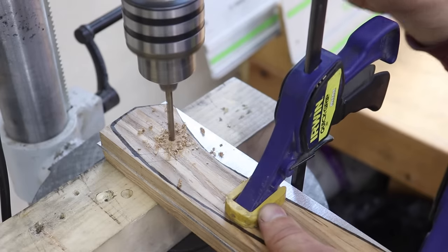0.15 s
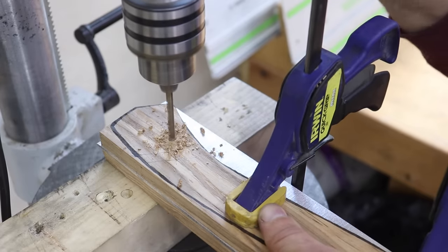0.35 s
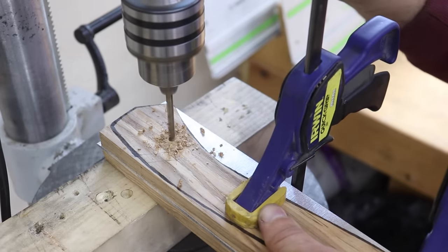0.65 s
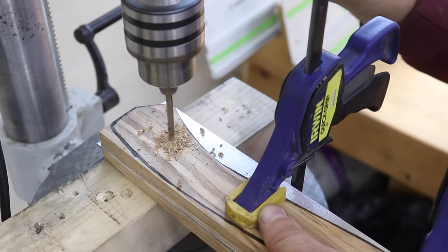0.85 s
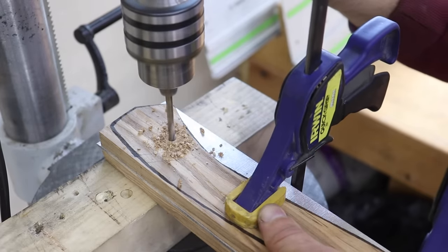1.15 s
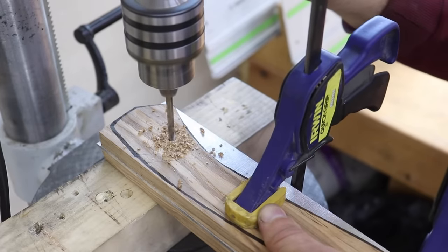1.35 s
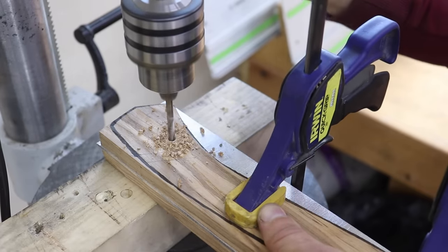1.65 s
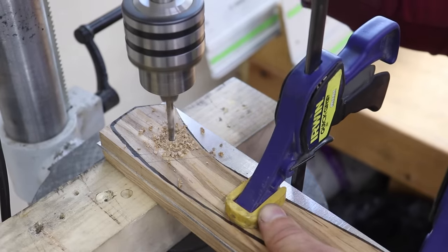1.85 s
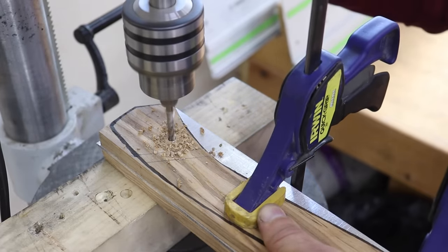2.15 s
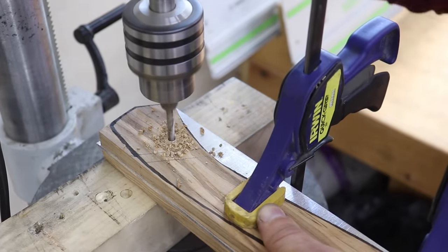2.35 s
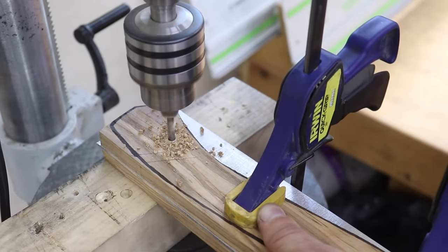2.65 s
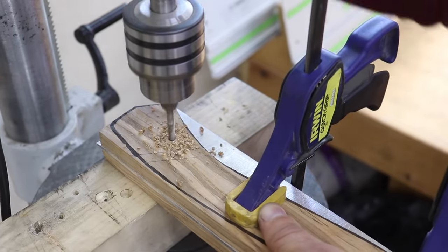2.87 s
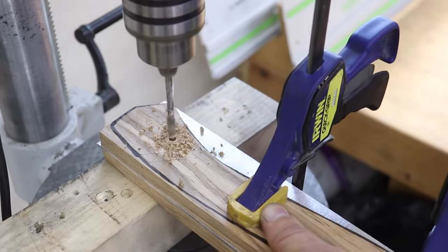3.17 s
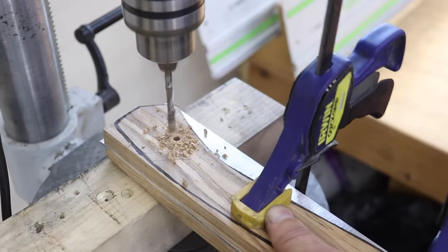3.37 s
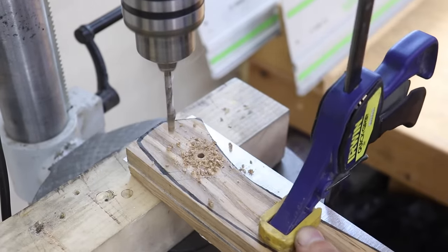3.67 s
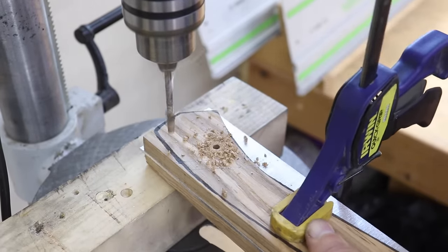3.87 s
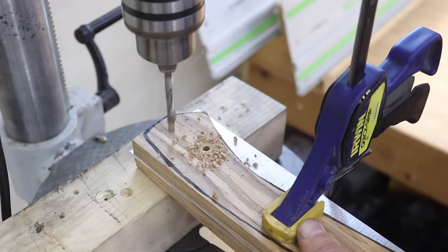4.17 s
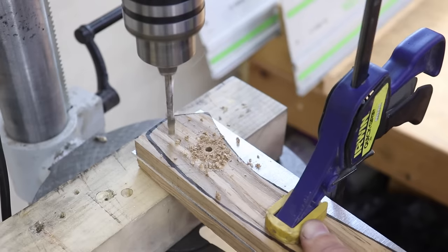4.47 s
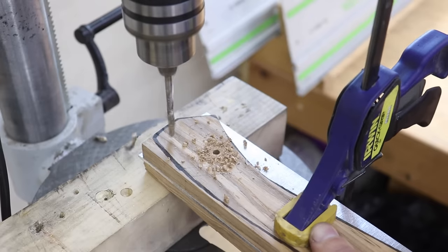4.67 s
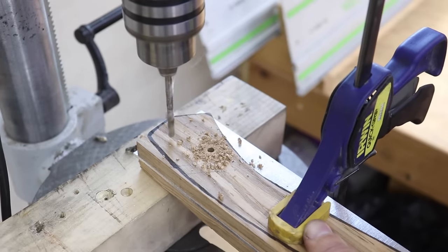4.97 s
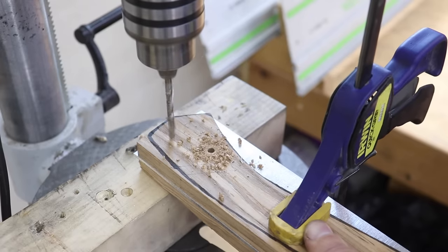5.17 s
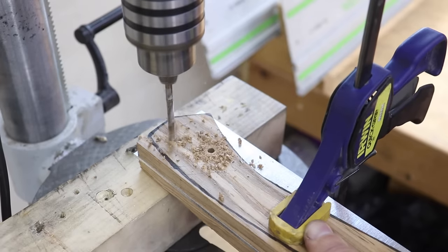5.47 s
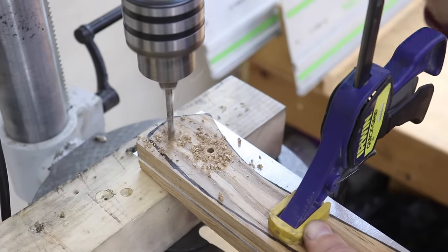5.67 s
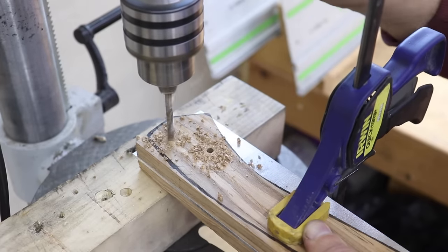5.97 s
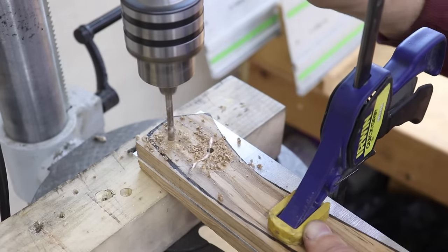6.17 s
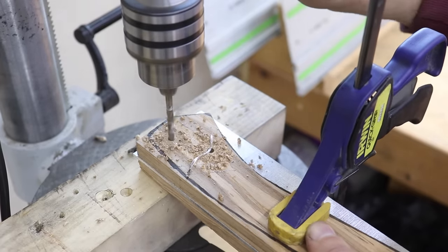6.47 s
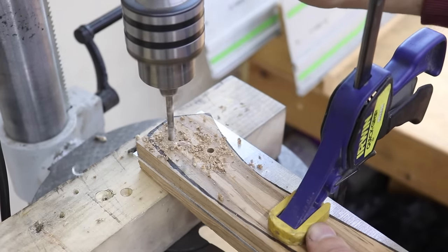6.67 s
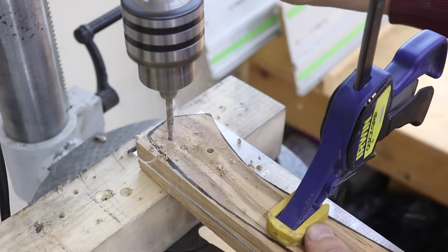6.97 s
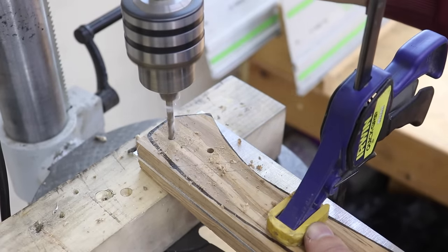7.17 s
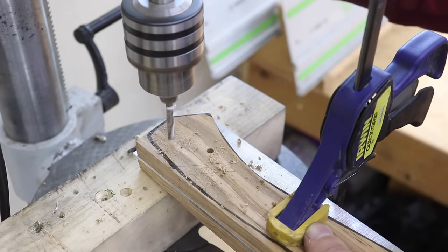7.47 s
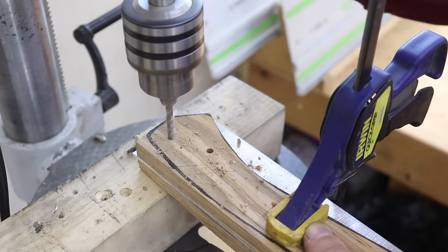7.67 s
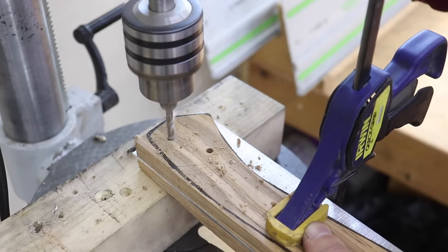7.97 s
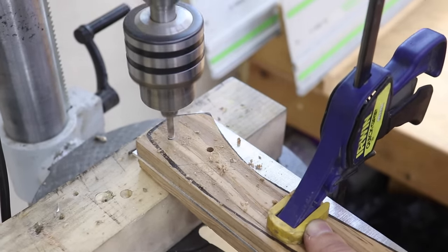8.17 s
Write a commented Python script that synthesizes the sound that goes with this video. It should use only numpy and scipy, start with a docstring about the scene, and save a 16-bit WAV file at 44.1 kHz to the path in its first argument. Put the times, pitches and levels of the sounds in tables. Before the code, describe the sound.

Close view of a bench drill press running without pause in a workshop. A steady motor hum and fast metallic rattle carry bright bearing hiss and the dry scrape of a bit in clamped wood. It cuts for about three seconds, pulls free with a chirp and sharp chip ticks, runs looser for two seconds, then bores a second hole with thin high squeals.

```python
"""The spindle of a bench drill press rattles in its cast head: three bursts of contacts a turn excite the
machine's resonances, with sine tones locked to the turns. Two spells of feed shorten the bursts.
A motor hums in three harmonics; grainy noise gives the hiss of bearings and the scrape of the bit in wood.
Gliding bands of noise squeal, a sine throbs at two bites a turn, chips tick and crumbs crackle.
A faint room noise lies beneath; the level of the machine sound dips briefly a few times."""
import sys
import numpy as np
from scipy import signal
from scipy.fft import rfft, irfft, next_fast_len
from scipy.io import wavfile
from scipy.ndimage import uniform_filter1d

SR = 44100
rng = np.random.default_rng(int(sys.argv[2]) if len(sys.argv) > 2 else 0)


def store_wav(level_fs):
    """Save 16-bit WAV to argv[1]."""
    pcm = np.round(np.clip(np.atleast_2d(level_fs), -1, 1) * 32767)
    wavfile.write(sys.argv[1], SR, pcm.T.astype(np.int16))


N = 367353

# Noise of the room: f/Hz, level/dB per Hz
ROOM_SPECTRUM = [(25, -99), (60, -91), (100, -80), (150, -78), (200, -71), (350, -69), (1000, -66),
                 (3000, -72), (6000, -90), (12000, -110)]
# Chips snapping and flying: t/s, level/dB at the onset, f/Hz, width/Hz (each of two filters is twice as wide)
CHIP_TICKS = [(.23, -21, 4300, 1200), (.345, -21, 4500, 3000), (1.612, -26, 11000, 4000),
              (2.995, -24, 7000, 2500), (3.002, -26, 10600, 600), (3.022, -18, 5900, 1300),
              (3.153, -26, 10200, 600), (3.843, -29, 9000, 7000), (4.037, -30, 10000, 5000),
              (4.2, -30, 9000, 7000), (4.376, -30, 11000, 6040), (4.40, -29, 11000, 6000),
              (4.54, -30, 11000, 6000), (5.19, -26, 5900, 4000), (6.196, -23, 11000, 4000),
              (6.981, -28, 12000, 5000), (7.149, -19.5, 4200, 800)]
# Lips biting harder and thumping the table: start t/s, end t/s, level/dB
HARD_BITES = [(1.816, 2.95, -57.5), (5.35, 5.956, -54.5), (7.0, 7.5, -55)]
# Colour of the hiss of bearings and flutes: f/Hz, relative level/dB
HISS_SPECTRUM = [(2500, -20), (3200, -1), (3700, 1), (4400, -0.5), (5200, -3), (6200, -3), (6800, -5.5),
                 (7300, -2), (8000, -4), (8600, -11.5), (10000, -18), (13000, -40)]
# Colour of the scrape of the lips: f/Hz, relative level/dB
SCRAPE_SPECTRUM = [(6000, -15), (8500, -2), (10000, 0), (11300, 2), (12600, -2.5), (14200, -1.5),
                   (15400, .5)]
# Swells of the hiss, mostly as the bit rubs in the wood: start t/s, end t/s, rise level/dB
RUBS = [(-.1, .5, 1.5), (5.1, 5.32, 3), (5.894, 6.393, 1), (6.997, 7.35, 1.5), (7.801, 8.496, 1)]
# Early echoes off column, table and bench: delay t/s, gain/1
ECHOES = [(.0017, .14), (.0048, .22), (.0113, -.22), (.019, .25)]
# Squeals of the bit in its hole: start t/s, end t/s, start f/Hz, end f/Hz, relative width/Hz, level/dB
SQUEAL_GLIDES = [(-.1, .46, 14300, 13900, 850, -38), (.385, .54, 14400, 15500, 600, -34),
                 (.84, 1.0, 15800, 15800, 400, -42), (1.5, 1.67, 10100, 10100, 600, -45),
                 (2.15, 2.958, 7200, 8630, 764, -40.5), (3.017, 3.18, 4370, 4360, 1800, -27),
                 (5.4, 5.707, 13300, 13600, 545, -46), (5.42, 6.302, 6380, 6150, 500, -39),
                 (5.75, 5.958, 14600, 15700, 800, -46), (6.05, 7.024, 10800, 10500, 535, -43),
                 (6.846, 8.25, 11800, 11300, 1800, -44), (7.34, 7.69, 15500, 15450, 500, -43),
                 (7.02, 7.5, 7600, 7600, 600, -40.5), (7.847, 8.327, 7750, 7700, 506, -36.5)]
# Second harmonic of the hum: t/s, level/dB
SECOND_HARMONIC = [(0, -26.5), (.27, -34.5), (.5, -26), (1.1, -27), (1.5, -32), (1.85, -27), (2.3, -31.5),
                   (5.25, -31.5), (5.9, -27.5), (6.3, -28.5), (7.35, -28), (7.7, -30.5), (8.1, -37.5),
                   (8.3, -28.5)]
# Third harmonic of the hum: t/s, relative level/dB
THIRD_HARMONIC = [(0, -27), (.38, -31), (.6, -33), (1.0, -48), (1.7, -29.5), (2.6, -31.5), (3.1, -29),
                  (5.15, -30), (5.35, -34.5), (5.95, -27), (6.2, -48), (6.78, -50), (7.15, -29), (7.4, -27),
                  (7.62, -29), (7.92, -30), (8.33, -46)]
# Rate of the spindle: t/s, f/Hz (turns per second)
SPINDLE_SPEED = [(0, 42.45), (.3, 42.8), (.56, 42.3), (.85, 42.27), (1.15, 41.78), (1.65, 42.33),
                 (2.18, 42.3), (2.62, 41.78), (3.0, 42.7), (4.85, 42.75), (5.25, 43.0), (5.8, 42.1),
                 (6.0, 42.45), (6.4, 42.08), (6.87, 42.12), (7.2, 42.45), (7.75, 42.15), (8.15, 41.55)]
# Tones of the spindle: multiple of the turn rate/1, relative level/dB running free, the same under load
SPINDLE_LINES = [(1, -67, -65), (3, -64, -65.5), (4, -61, -69), (6, -45.5, -43.5), (9, -52, -43.5),
                 (11, -50, -41.5), (12, -41, -47), (14, -41.5, -46.5), (17, -53, -41.5), (27, -39, -31.5),
                 (30, -31.5, -30.5), (33, -32, -29.5), (36, -38, -39.5), (39, -36, -25.5), (42, -44, -47),
                 (43, -39, -37.5), (50, -43, -47), (51, -29.5, -47), (53, -41, -47), (54, -39, -31)]
# Resonances of head, table and belt guard:
# f/Hz, width/Hz, relative level/dB per Hz running free, relative level/dB per Hz under load
BODY_MODES = [(180.4, 13, -60.5, -61.5), (241, 34, -58, -60.5), (399, 37, -50.5, -54.5),
              (452, 23, -58, -60), (519, 24, -56.5, -55.5), (625, 19.7, -44.5, -49.5),
              (735, 120, -54.5, -59.5), (821, 65, -50, -59), (1023, 105, -50.5, -55.5),
              (1134.4, 21.3, -46.5, -43), (1235, 24.5, -46.5, -46.5), (1286, 17.6, -41.5, -45.5),
              (1405.5, 29, -53.5, -43.5), (1556, 95, -51.5, -57), (1650, 42, -46.5, -44.5),
              (1738, 25, -51, -47.5), (1805, 41.5, -42.5, -44), (1961, 55, -44.5, -52),
              (2123, 52, -51, -42.5), (2257, 51, -39.5, -41.5), (2460, 21, -45.5, -46),
              (2545, 41, -48, -51), (2750, 41, -52.5, -55), (2853, 28, -49, -51), (3016, 100, -53.5, -53.5),
              (3400, 35, -53, -58.5)]
# Pushes on the feed lever: start t/s, end t/s, load on the bit/1 (1 is full load)
FEED_PUSHES = [(-.2, 0.31, .35), (.35, 3.06, 0.85), (5.27, 6.45, 0.59), (6.03, 7.95, 1.05), (7.5, 9.2, .72)]
# Brief dips in the level of the machine sound: start t/s, end t/s, depth level/dB, fade t/s
LEVEL_DIPS = [(0.822, 0.978, 5.5, 0.067), (1.933, 2.004, 11.5, .035), (2.22, 2.29, 3.8, .035),
              (7.43, 7.573, 2.5, .06), (7.542, 7.848, 6, 0.058)]

BITE_S, WITHDRAW_S = 0.24, 0.24   # the load builds up and lets go
MOTOR_HZ = 210.02
PLAY_TURNS = .0026   # spread of the spindle's angle when running free
DRIVE_DB = .3   # gain of rattle and spindle tones together
HUM_FREE_DB, HUM_LOADED_DB = -38.5, -34.5   # the motor's fundamental
HISS_FREE_DB, HISS_LOADED_DB = -33, -33.5   # bearings and flutes
SCRAPE_FREE_DB, SCRAPE_LOADED_DB = -41, -39   # lips of the bit
THUMP_FREE_DB, THUMP_LOADED_DB = -66, -59.5
CHIP_DECAY_S = 0.0046
CRUMB_SPREAD_DB = 3.0
CUTOFF_HZ = 15660


def from_db(db):
    """Decibel definition: 20 dB is a factor of ten in amplitude."""
    return 10 ** (np.asarray(db) / 20)


def rms_one(x):
    """Normalization by the root mean square, to rms 1."""
    return x / np.sqrt(np.mean(x ** 2) + 1e-20)


def seconds():
    """Uniform sampling: the time of every sample."""
    return np.arange(N) / SR


def in_time(rows):
    """Linear interpolation of each column of a curve at every sample."""
    t, *columns = np.transpose(rows)
    return [np.interp(seconds(), t, column) for column in columns]


def swell(start, end, rise_s, fall_s):
    """Trapezoidal envelope: rise, hold and fall between two times, 0-1."""
    t = seconds()
    return np.clip(np.minimum((t - start) / rise_s, (end - t) / fall_s), 0, 1)


def by_load(load, free_db, loaded_db):
    """Linear interpolation in decibels from the free-running to the loaded gain."""
    return from_db(free_db + load * (loaded_db - free_db))


def drift(rate_hz):
    """Low-pass-filtered noise: a smooth random course of rms 1, changing about `rate_hz` times a second."""
    step = 40   # samples between the points of the slow course
    r = np.exp(-2 * np.pi * rate_hz * step / SR)
    noise = rng.standard_normal(N // step + 2002)
    slow = signal.lfilter([1], [1, -2 * r, r * r], noise)[2000:]   # skip the settling of the filter
    return np.interp(np.arange(N) / step, np.arange(len(slow)), rms_one(slow))


def resonate(x, hz, width):
    """Damped resonator: a pole pair with about unit gain at its peak."""
    r, w = np.exp(-np.pi * width / SR), 2 * np.pi * hz / SR
    return signal.lfilter(np.array([1, 0, -1]) * (1 - r * r) / 2, [1, -2 * r * np.cos(w), r * r], x)


def colour(x, spectrum):
    """Spectral shaping: decibels interpolated over log frequency weight the Fourier bins."""
    hz, db = np.transpose(spectrum)
    size = next_fast_len(N)
    bins = np.maximum(np.fft.rfftfreq(size, 1 / SR), 1)
    gain = from_db(np.interp(np.log(bins), np.log(hz), db))
    return irfft(rfft(x, size) * gain, size)[:N]


def evened(x, span_s, amount):
    """Level compression: slow swells are pulled towards the mean power."""
    power = uniform_filter1d(x * x, int(span_s * SR)) + 1e-20
    return x * (power / power.mean()) ** (-amount / 2)


def grains(spread_db):
    """Granular friction: dense tiny contacts of very uneven size, rms 1."""
    sizes = np.repeat(rng.standard_normal(N // 24 + 1), 24)[:N]
    return rms_one(rng.standard_normal(N) * from_db(spread_db * np.minimum(sizes, 3)))


def echoed(x):
    """Comb filtering: delayed reflections from nearby hard surfaces interfere with the direct sound."""
    reflections = sum(gain * np.pad(x, (round(delay * SR), 0))[:N] for delay, gain in ECHOES)
    return x + reflections


def feed():
    """Forced loading: the load on the bit follows the strongest push on the lever."""
    return np.max([force * swell(start, end, BITE_S, WITHDRAW_S) for start, end, force in FEED_PUSHES], axis=0)


def level_dips():
    """Amplitude modulation: depth of the brief dips in level, in dB."""
    return sum(depth * swell(start, end, fade, fade) for start, end, depth, fade in LEVEL_DIPS)


def room_noise():
    """Stationary random noise with a prescribed power density."""
    return colour(rng.standard_normal(N), ROOM_SPECTRUM) * np.sqrt(SR / 2)


def crumbs(per_s=45, level_db=-43.5, decay_s=0.004):
    """Poisson impacts: loose crumbs of wood crackle on the blank and table at random."""
    happens = rng.random(N) < per_s / SR
    sizes = from_db(CRUMB_SPREAD_DB * np.minimum(rng.exponential(1, N), 3)) * happens
    # the tiny offset keeps the filter clear of vanishingly small numbers
    bursts = signal.lfilter([1], [1, -np.exp(-1 / (decay_s * SR))], sizes + 1e-18)
    spectrum = [(2000, -25), (4000, 0), (8000, 0), (11000, -4), (16000, -10)]   # f/Hz, relative level/dB
    crackle = colour(rng.standard_normal(N), spectrum)
    return from_db(level_db) * bursts * rms_one(crackle)


def chips():
    """Exponential decay: each chip gives a short tick of band-limited noise."""
    out, t = np.zeros(N), np.arange(SR // 20) / SR
    for start, db, hz, width in CHIP_TICKS:
        noise = rng.standard_normal(len(t))
        ring = resonate(resonate(noise, hz, 2 * width), hz, 2 * width)
        at = round(start * SR)
        out[at:at + len(t)] += from_db(db) * rms_one(ring) * np.exp(-t / CHIP_DECAY_S)
    return out


def thump(turns, load, uneven_db=3.5, fade_s=0.093):
    """Periodic forcing: two bites a turn give a low sine throb, stronger under load."""
    hard = sum(from_db(db) * swell(start, end, fade_s, fade_s) for start, end, db in HARD_BITES)
    gain = np.maximum(by_load(load, THUMP_FREE_DB, THUMP_LOADED_DB), hard)
    throb = np.sqrt(2) * np.sin(4 * np.pi * turns)
    return gain * from_db(uneven_db * drift(7)) * throb


def rubbing(turns, load, flicker_db=1.56, pulse_depth=0.064, rub_fade_s=0.051):
    """Friction noise: bearing hiss and the finer scrape of two lips, with crumbs, brightest under load."""
    hiss = by_load(load, HISS_FREE_DB, HISS_LOADED_DB) * rms_one(colour(grains(spread_db=2.5), HISS_SPECTRUM))
    scrape = rms_one(colour(grains(spread_db=2.5), SCRAPE_SPECTRUM))
    scrape *= by_load(load, SCRAPE_FREE_DB, SCRAPE_LOADED_DB)
    lips = 1 + pulse_depth * np.sin(4 * np.pi * turns)   # two lips pass in each turn
    rub_db = sum(rise * swell(start, end, rub_fade_s, rub_fade_s) for start, end, rise in RUBS)
    friction = (hiss + scrape) * lips * from_db(rub_db + flicker_db * drift(53))
    bright = echoed(friction + crumbs())
    # out of the wood the very top fades
    dull = colour(bright, [(11000, 0), (13200, -2.5), (16000, -7)])   # f/Hz, level/dB
    return dull + np.clip(load, 0, 1) * (bright - dull)


def squeals(turns, flutter_db=2.2, fade_s=0.088, slip_depth=0.4, broaden=2.2):
    """Stick-slip: the bit grips the wall of its hole in gliding narrow-band whistles, chirping twice a turn."""
    t, out = seconds(), np.zeros(N)
    chirp = 1 + slip_depth * np.sin(4 * np.pi * turns + drift(25))
    flutter = from_db(flutter_db * drift(35)) * chirp
    for start, end, start_hz, end_hz, width, db in SQUEAL_GLIDES:
        on = (t > start) & (t < end)
        r = np.exp(-np.pi * broaden * width / SR)
        slips = signal.lfilter([1], [1, -2 * r, r * r], rng.standard_normal((2, N))[:, on])
        glide_hz = np.interp(t[on], [start, end], [start_hz, end_hz])
        phase = 2 * np.pi * np.cumsum(glide_hz) / SR
        # slow noise on both quadratures becomes a band around the gliding pitch
        whistle = slips[0] * np.cos(phase) + slips[1] * np.sin(phase)
        out[on] += from_db(db) * swell(start, end, fade_s, fade_s)[on] * rms_one(whistle * flutter[on])
    return out


def motor(load, third_db=-2.0, waver_rad=0.23, beat_depth=0.5, flutter_db=.8):
    """Harmonic series: a hum of three partials; the lowest grows under load, the top one beats unevenly."""
    (second,), (third,) = in_time(SECOND_HARMONIC), in_time(THIRD_HARMONIC)
    beating = 1 + beat_depth * rms_one(resonate(rng.standard_normal(N), hz=9.6, width=6.6))
    fundamental_gain = by_load(load, HUM_FREE_DB, HUM_LOADED_DB)
    gains = fundamental_gain, from_db(second), from_db(third + third_db) * beating
    out = np.zeros(N)
    for k, gain in enumerate(gains, 1):
        phase = 2 * np.pi * (k * MOTOR_HZ * seconds() + rng.random()) + k * waver_rad * drift(7.4)
        out += gain * from_db(flutter_db * drift(3.1)) * np.sin(phase)
    return np.sqrt(2) * out


def spindle_tones(turns, load, flutter_db=1.84):
    """Phase modulation: lines locked to the spindle, the high ones blurred by play in the drive."""
    angle = turns + PLAY_TURNS * (1 - .5 * load) * drift(15)
    out = np.zeros(N)
    for multiple, free_db, loaded_db in SPINDLE_LINES:
        gain = by_load(load, free_db, loaded_db) * from_db(flutter_db * drift(8.6))
        out += gain * np.sin(2 * np.pi * (multiple * angle + rng.random()))
    return np.sqrt(2) * out


def rattle(turns, load, free_decay=0.47, loaded_decay=0.28, lopsided=0.044, repeat_share=0.092,
           top_hz=3400, level_db=-1.0):
    """Modal excitation: three bursts of contacts a turn ring the machine's resonances."""
    # feed pressure takes up the play and makes each burst shorter (decay in parts of its cycle)
    decay = np.maximum(free_decay + load * (loaded_decay - free_decay), .05)
    knocks = np.exp(-(3 * turns % 1) / decay) / np.sqrt(decay)
    knocks = rms_one(knocks * (1 + lopsided * np.cos(2 * np.pi * turns)))
    # the same worn spots meet again on every turn; the rest is loose play
    turn_size = int(N / turns[-1])
    worn = rms_one(irfft(np.exp(2j * np.pi * rng.random(turn_size // 2 + 1))))
    repeating = np.sqrt(repeat_share) * np.interp(turns % 1, np.linspace(0, 1, len(worn)), worn)
    out = np.zeros(N)
    for k, (hz, width, free_db, loaded_db) in enumerate(BODY_MODES):
        loose = np.sqrt(1 - repeat_share) * rng.standard_normal(N)
        force = knocks * (repeating * (-1) ** k + loose)   # neighbouring modes get opposite signs
        # slow swells of each resonance are evened out, so the rattle keeps a steady level
        ring = rms_one(evened(resonate(force, hz, width), span_s=0.014, amount=0.2))
        bandwidth_gain = np.sqrt(np.pi * width / 2)   # from density per Hz to level
        out += ring * bandwidth_gain * by_load(load, level_db + free_db, level_db + loaded_db)
    # the casting radiates neither deep bass nor treble
    out = signal.sosfilt(signal.butter(4, top_hz, fs=SR, output="sos"), out)
    return signal.sosfilt(signal.butter(4, 150, "high", fs=SR, output="sos"), out)


def scene(hum_dip_share=0.93, hiss_dip_share=0.83):
    """Superposition: sources share spindle angle and load; hum and hiss dip along with the rattle."""
    (speed,), load, dip_db = in_time(SPINDLE_SPEED), feed(), level_dips()
    turns = np.cumsum(speed) / SR
    background = room_noise() + chips() + thump(turns, load)
    friction = rubbing(turns, load) * from_db(-hiss_dip_share * dip_db) + squeals(turns)
    hum = motor(load) * from_db(-hum_dip_share * dip_db)
    drive = evened(rattle(turns, load) + spindle_tones(turns, load), span_s=0.032, amount=0.9)
    return (background + friction + hum + drive * from_db(DRIVE_DB - dip_db))[None]


def record(dry):
    """Saturation and low-pass filtering: the highest peaks are rounded and the top is cut steeply."""
    rounded = dry / (1 + (dry / .8) ** 8) ** (1 / 8)
    return signal.sosfilt(signal.ellip(12, .1, 90, CUTOFF_HZ, fs=SR, output="sos"), rounded)


dry = scene()
out = record(dry)
store_wav(out)
```